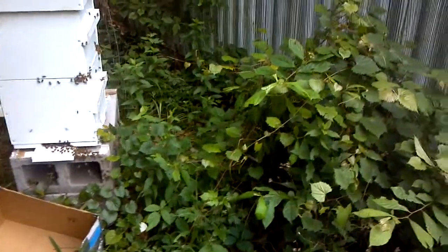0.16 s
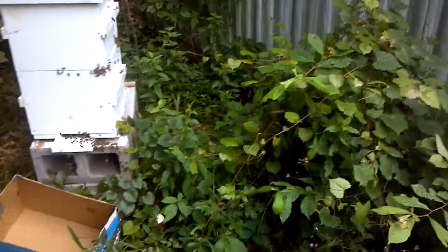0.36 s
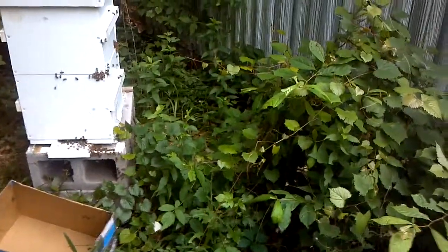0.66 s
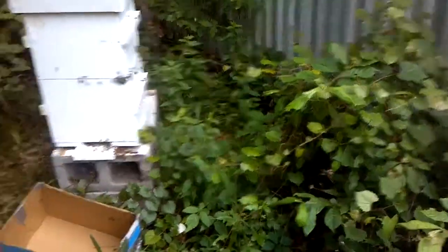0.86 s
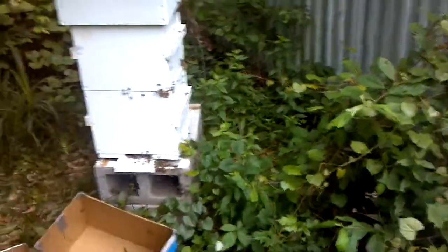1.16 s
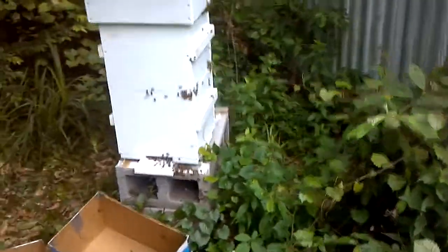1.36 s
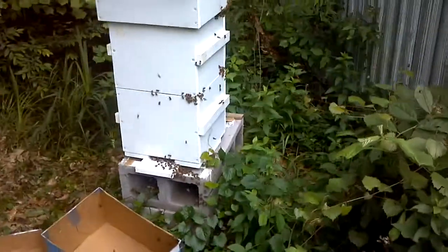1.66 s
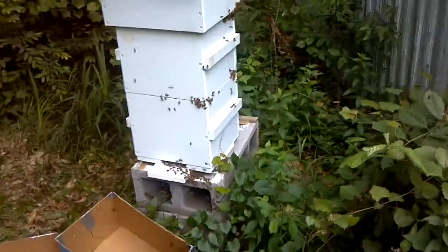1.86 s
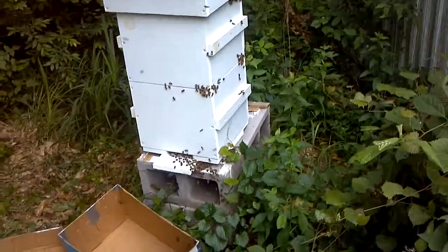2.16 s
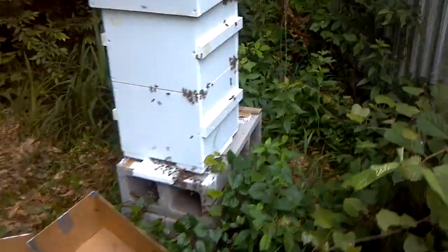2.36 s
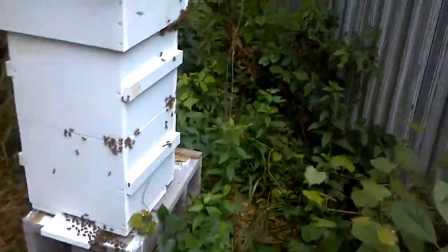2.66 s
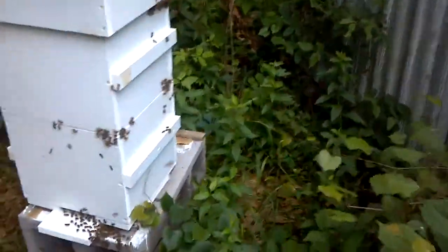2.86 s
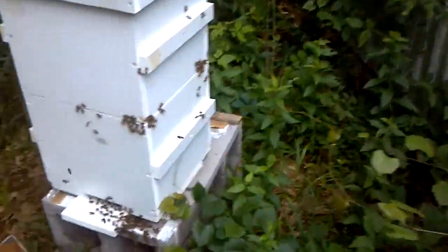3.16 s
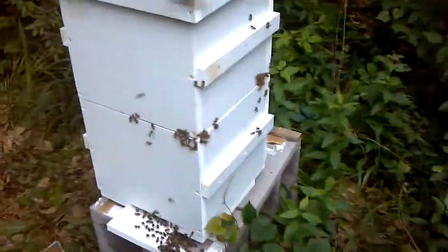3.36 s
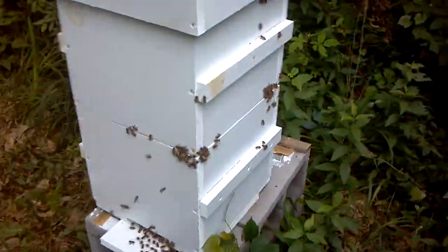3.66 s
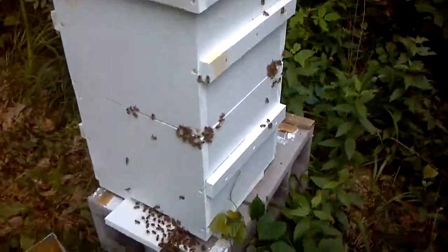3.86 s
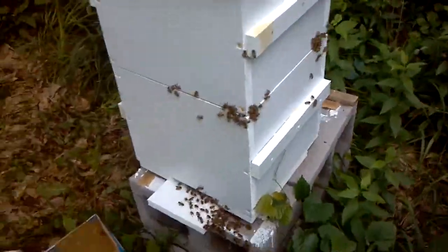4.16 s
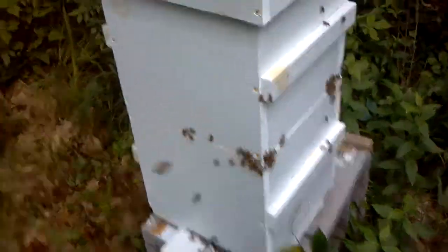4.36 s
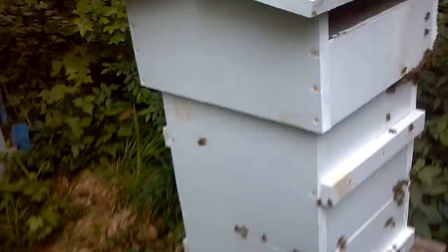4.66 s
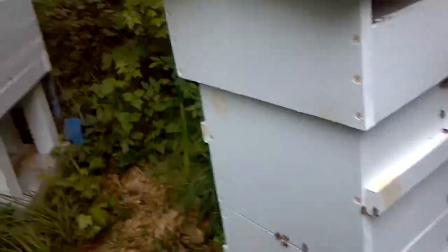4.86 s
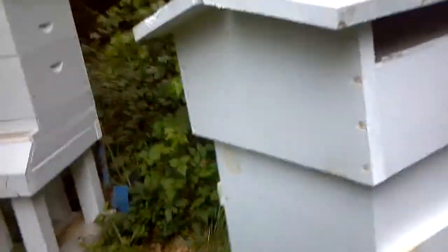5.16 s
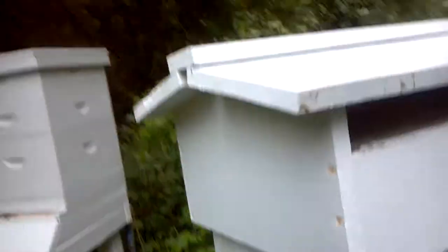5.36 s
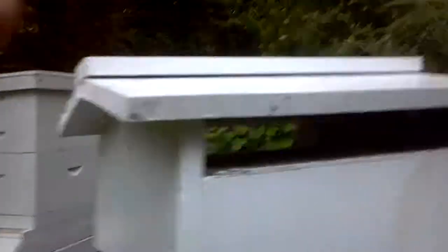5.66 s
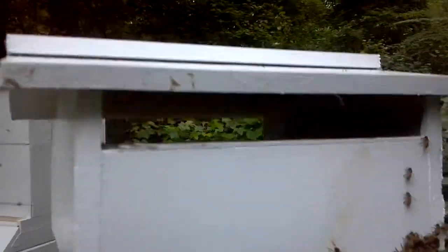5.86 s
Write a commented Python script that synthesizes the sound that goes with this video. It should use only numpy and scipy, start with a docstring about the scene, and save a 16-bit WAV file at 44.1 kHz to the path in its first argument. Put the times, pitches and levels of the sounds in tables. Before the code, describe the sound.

In a still, overgrown yard, a soft unsteady hum of many bees, around 200 to 260 hertz, sits over quiet air, a faint drone and a thin distant insect trill. From 0 to 2 s, branches swish lightly, a stalk snaps at 0.4 s, and small cracks cluster from 1.5 to 1.9 s. At about 2.45 s a board is knocked hard, a tight cluster of woody raps, followed by sharp stem snaps to 2.7 s and a tiny high squeak at 2.8 s. At 3.3 s there is a dull board thud, a footstep and a strong snap. Then leaves rustle more thickly, with gritty scuffs at 3.8, 4.8, 5.1 and 5.4 s, while the hum rises and single bees buzz close at 3.4, 3.65, 4.3, 5.1 and loudest at 5.55 s. At 5.8 s loose wood clatters rapidly and rasps, leaving hum and rustle until 6 s.

```python
"""Honey bees hum around a wooden hive in an overgrown yard: looped wing strokes at unsteady rates; some pass close.
Someone walks up through weeds: filtered noise swishes, rustles and scuffs; stalks snap and squeak, twigs tick.
A board is knocked and loose wood clatters and rubs: decaying modes, contact noise, rasping resonances.
Behind lie still air, a far insect and a faint drone.
The microphone is a close pair of ports, each channel formed as the difference of the two."""
import sys
import numpy as np
from scipy import signal
from scipy.fft import rfft, irfft, next_fast_len
from scipy.io import wavfile

SR = 44100
rng = np.random.default_rng(int(sys.argv[2]) if len(sys.argv) > 2 else 0)


def wrap_up_sound(samples):
    """Save the sound to the file named by the first command line argument, as 16-bit audio."""
    columns = np.atleast_2d(samples).T
    # keep every value between -1 and 1, then stretch to whole-number steps
    tamed = np.clip(columns, -1, 1)
    steps = np.round(tamed * 32767).astype(np.int16)
    wavfile.write(sys.argv[1], SR, steps)


N = 265651
TIME_S = np.arange(N) / SR
PORT_LAG_SAMPLES = 17   # travel from one port to the other


def from_db(db):
    """Decibels to gain."""
    return 10 ** (np.asarray(db) / 20)


def rms_one(x):
    """Scale to an rms of 1."""
    return x / np.sqrt(np.mean(x ** 2) + 1e-20)


def level_curve_db(rows):
    """Level at every sample from (t/s, level/dB) rows."""
    t_s, level_db = np.transpose(rows)
    return np.interp(TIME_S, t_s, level_db)


def at_hz(points, hz):
    """A spectrum read on a log-frequency axis."""
    point_hz, level_db = np.transpose(points)
    return np.interp(np.log(hz + 1e-9), np.log(point_hz), level_db)


def drift(rate_hz):
    """Random curve: straight lines between normal knots, rate_hz knots a second."""
    knots = rng.standard_normal(int(rate_hz * N / SR) + 3)
    return np.interp(TIME_S * rate_hz + rng.random(), np.arange(len(knots)), knots)


def swell(t_s, sigma_s):
    """A bell-shaped rise and fall."""
    return np.exp(-.5 * np.minimum(((TIME_S - t_s) / sigma_s) ** 2, 100))


def resonance(x, hz, width_hz):
    """A two-pole band-pass with gain near 1 on top."""
    r = np.exp(-np.pi * width_hz / SR)
    b = np.array([1, 0, -1]) * (1 - r * r) / 2
    a = [1, -2 * r * np.cos(2 * np.pi * hz / SR), r * r]
    return signal.lfilter(b, a, x + 1e-18)


def resonance_twice(x, hz, width_hz):
    """The same band-pass twice, for steeper skirts."""
    return resonance(resonance(x, hz, width_hz), hz, width_hz)


def butter(x, order, hz, side="low"):
    """Butterworth low-pass or high-pass."""
    return signal.sosfilt(signal.butter(order, hz, side, fs=SR, output="sos"), x)


def decaying(impulses, t60_s):
    """Each impulse starts an exponential decay of 60 dB in t60_s."""
    return signal.lfilter([1], [1, -np.exp(-np.log(1000) / (t60_s * SR))], impulses)


def diffuse(spectrum=None):
    """Noise from all around: the ports agree in the bass and differ in the treble."""
    size = next_fast_len(N)
    hz = np.arange(size // 2 + 1) * SR / size
    alike = np.sinc(2 * hz * PORT_LAG_SAMPLES / SR)
    mid, side = rfft(rng.standard_normal((2, size)))
    ports = np.sqrt(1 + alike) * mid + np.sqrt(1 - alike) * side * [[1], [-1]]
    colour = 1 if spectrum is None else from_db(at_hz(spectrum, hz))
    return rms_one(irfft(ports * colour, size)[:, :N])


def from_bearing(x, bearing):
    """A sound reaches the nearer port first; bearing 1 is left, -1 is right."""
    n, lag = np.arange(N), bearing * PORT_LAG_SAMPLES / 2
    return np.array([np.interp(n + lag, n, x), np.interp(n - lag, n, x)])


# air colour: f/Hz, level/dB
AIR_COLOUR = [(25, -18), (60, -16), (110, 1), (250, 4), (700, 12.5), (1500, -9), (3000, -44), (8000, 7),
              (16000, -6.5)]
INSECT_HZ, INSECT_WIDTH_HZ, INSECT_DB = 5950, 210, -68.5
DRONE_HZ, DRONE_WIDTH_HZ, DRONE_DB = 118.8, 5.7, -77.5


def yard(air_db=-62):
    """Still outdoor air (shaped noise), a far insect's thin trill and a low drone (narrow-band noise)."""
    trill = from_db(INSECT_DB) * rms_one(resonance_twice(diffuse(), INSECT_HZ, INSECT_WIDTH_HZ))
    drone = from_db(DRONE_DB) * rms_one(resonance_twice(diffuse(), DRONE_HZ, DRONE_WIDTH_HZ))
    return from_db(air_db) * diffuse(AIR_COLOUR) + trill + drone


# dull stem colour: f/Hz, level/dB
BRUSH_COLOUR = [(60, -41), (110, -3.5), (300, 8), (700, 3), (1200, 2.5), (1700, 8), (2200, 9), (3200, -36),
                (5000, -41), (15000, -43)]
# leaf colour: f/Hz, level/dB
LEAF_COLOUR = [(500, -22), (2000, -7), (3400, 6.5), (4300, 1), (6000, 3), (9000, 2.5), (12000, 0),
               (15500, -1)]
# depth of the wading, as steady rustle before trim: t/s, level/dB
WADING = [(0, -65.5), (1.9, -60.5), (3.1, -57), (5.2, -56), (6.02, -50.5)]


def twigs(dry_per_s=12, dry_db=-47, dry_t60_s=.004,
          green_per_s=12, green_db=-47, green_t60_s=.007, spread_db=1.5, low_hz=700):
    """Dry twigs tick brightly and green stems dully, at random, louder where the weeds are thick."""
    depth_db = level_curve_db(WADING)
    swing_db = depth_db - depth_db.mean()

    def ticks(colour, per_s, level_db, t60_s):
        """Random breaks, each a short decay of coloured noise."""
        gain = from_db(level_db + swing_db + spread_db * rng.uniform(0.51, 1, N))
        breaks = (rng.random(N) < per_s / SR) * gain
        return diffuse(colour) * decaying(breaks + 1e-18, t60_s)

    dry_ticks = ticks(LEAF_COLOUR, dry_per_s, dry_db, dry_t60_s)
    green_ticks = ticks(BRUSH_COLOUR, green_per_s, green_db, green_t60_s)
    return butter(dry_ticks + green_ticks, 2, low_hz, "high")


# stems drawn over cloth: t/s, sigma/s, f/Hz, glide/(Hz/s), level/dB
SQUEAKS = [(0.46, .035, 12600, -21000, -55), (2.84, .018, 14200, 0, -45), (4.04, .055, 12050, 0, -50)]


def squeaks(roughness_hz=220):
    """Stem over cloth: a thin, rough whistle swells and fades; its pitch holds or glides evenly."""
    whistle, roughness = np.zeros(N), rms_one(drift(roughness_hz))
    for t_s, sigma_s, hz, glide, level_db in SQUEAKS:
        pitch_hz = hz + glide * np.clip(TIME_S - t_s, -3 * sigma_s, 3 * sigma_s)
        tone = np.sin(2 * np.pi * np.cumsum(pitch_hz) / SR)
        whistle += tone * swell(t_s, sigma_s) * from_db(level_db)
    return from_bearing(whistle * roughness, -0.27)


SLIDE_OFF_RATIO = 2.14   # fall time over rise time


def sweep(t_s, rise_s):
    """A branch bends against the body, then slides off more slowly."""
    return np.where(TIME_S < t_s, swell(t_s, rise_s), swell(t_s, rise_s * SLIDE_OFF_RATIO))


def shifting(x, depth_db=1.72, rate_hz=7, count=5):
    """The colour of a rustle keeps changing: each treble band rises and falls by itself."""
    change = 0
    for hz in np.geomspace(3700, 13500, count):
        change = change + resonance(x, hz, 0.85 * hz) * (from_db(depth_db * drift(rate_hz)) - 1)
    return rms_one(x + change)


# branches passing the body, before trim: t/s, rise sigma/s, stem level/dB, leaf level/dB, brightness/dB
SWISHES = [(0.22, 0.098, -54, -57.5, -1.5), (0.91, 0.1, -53.5, -62, 3.5), (1.44, 0.094, -60, -60, 1),
           (2.26, 0.21, -52.5, -58, -6.5), (2.56, 0.047, -51, -50, 3), (2.81, 0.069, -47.5, -54, 1),
           (3.24, 0.067, -47.5, -47, 2), (3.64, 0.13, -52, -50, 1.5), (4.03, 0.078, -53, -52.5, -2.5),
           (4.29, 0.13, -49.5, -50.5, 0), (4.77, 0.095, -50.5, -46.5, 0.5), (5.06, 0.046, -53.5, -46, 1),
           (5.3, 0.14, -49.5, -45.5, -0.5), (5.72, 0.023, -55, -53, -6)]
STEMS_DB, STEMS_FOLLOW = -57, 0.43   # before trim, at the mean rustle; share of the rustle's dB swing


def weeds(stem_trim_db=-0.5, leaf_trim_db=3.0, grain_db=1.5, crisp_hz=5200):
    """Stems brush dully, leaves rustle in fine grains; each branch adds a swish to the steady wading."""
    depth_db = level_curve_db(WADING)
    # powers
    stems = from_db(STEMS_DB + STEMS_FOLLOW * (depth_db - depth_db.mean())) ** 2
    soft = crisp = from_db(depth_db) ** 2
    for t_s, rise_s, stem_db, leaf_db, bright_db in SWISHES:
        contact = sweep(t_s, rise_s)
        stems = stems + (contact * from_db(stem_db)) ** 2
        soft = soft + (contact * from_db(leaf_db - bright_db)) ** 2
        crisp = crisp + (contact * from_db(leaf_db + bright_db)) ** 2
    leaves = shifting(diffuse(LEAF_COLOUR))
    soft_rustle = butter(leaves, 3, crisp_hz) * np.sqrt(soft)
    crisp_rustle = butter(leaves, 3, crisp_hz, "high") * np.sqrt(crisp)
    brushing = diffuse(BRUSH_COLOUR) * np.sqrt(stems) * from_db(stem_trim_db + 1.0 * drift(40))
    leaf_gain = from_db(leaf_trim_db + grain_db * drift(500) + 1.8 * drift(24.955))
    return brushing + (soft_rustle + crisp_rustle) * leaf_gain


# soft earth colour: f/Hz, level/dB
GROUND_COLOUR = [(40, -30), (120, -12), (250, 16), (1500, -2), (8000, 5)]
# gritty scrape colour: f/Hz, level/dB
SCRAPE_COLOUR = [(60, -43), (200, -12), (700, 1.5), (1500, 6), (2600, 5.5), (4500, 1), (6500, 2),
                 (10000, -2.5), (15500, -17)]
# feet on the ground: t/s, sigma/s, thud f/Hz, thud level/dB, scrape level/dB
SCUFFS = [(1.726, 0.03, 800, -74, -53.5), (3.267, 0.041, 500, -57.5, -45), (3.278, 0.0084, 627, -40, -52),
          (3.77, 0.048, 418, -59, -41.5), (3.772, 0.005, 900, -44, -39), (3.79, 0.012, 820, -48, -40),
          (4.827, 0.004, 690, -47, -38.5), (4.85, 0.018, 477, -46, -43.5), (5.091, 0.0017, 634, -38.5, -50),
          (5.103, 0.024, 610, -45, -59), (5.195, 0.018, 590, -45.5, -50), (5.208, 0.0035, 620, -44, -48),
          (5.246, 0.019, 670, -41.5, -49.5), (5.42, 0.004, 760, -39, -36), (5.428, 0.0096, 745, -45, -35),
          (5.448, 0.0065, 636, -37.5, -42)]


def scuffs(thud_width=0.64, grit_db=1.0, catch_db=3.5):
    """Each scuff is a soft thud of the ground under a gritty scrape that catches and slips."""
    ground = diffuse(GROUND_COLOUR)
    grit = diffuse(SCRAPE_COLOUR) * from_db(grit_db * drift(900) + catch_db * drift(150))
    out = np.zeros((2, N))
    for t_s, sigma_s, hz, thud_db, scrape_db in SCUFFS:
        thud = rms_one(resonance_twice(ground, hz, thud_width * hz))
        out += swell(t_s, sigma_s) * (from_db(thud_db) * thud + from_db(scrape_db) * grit)
    return out


# broad resonances of a breaking stalk: f/Hz, width/Hz, gain/dB
STALK_RESONANCES = [(1300, 2190, -15.5), (3670, 3650, -12.5), (6530, 3800, -11.5), (10500, 11000, -9.5)]
# snaps: t/s, level/dB in the four resonances low to high, unused level/dB, splintering re break/dB
SNAPS = [(0.3894, -41, -51, -62, -57, -60, -15), (1.5474, -37.5, -45, -43, -49, -50, -15),
         (1.5883, -40, -52, -63, -63, -61, -15), (1.6586, -37.5, -69, -49.5, -58, -58, -15),
         (1.7135, -48, -57, -46, -47, -49, -15), (1.7204, -54, -47, -61, -54, -52, -15),
         (1.7284, -50, -57, -64, -49, -53, -15), (1.7364, -51, -57, -52, -60, -56, -15),
         (1.8302, -46, -50, -76, -49.5, -54, -15), (1.9131, -38.5, -54, -62, -58, -63, -15),
         (1.9305, -40.5, -49, -57, -58, -62, -15), (2.5356, -28, -40, -62, -50, -50, -15),
         (2.5925, -33, -41, -40, -43, -46, -15), (2.6509, -35.5, -46.5, -60, -56, -52, -15),
         (2.6948, -36.5, -53, -46.5, -56, -57, -15), (2.7087, -47, -42, -50, -54, -55, -15),
         (2.7282, -29.5, -47, -59, -57, -57, -15), (3.0395, -31, -45.5, -54, -57, -60, -15),
         (3.3169, -26.5, -38, -46, -47, -47, -15), (3.5304, -34.5, -33.5, -43, -44, -51, -15),
         (3.5533, -33.5, -66, -44, -48, -50, -15), (4.1639, -33.5, -39, -43, -41, -48, -15),
         (4.4374, -37.5, -43, -45, -53, -52, -15), (4.6344, -39.5, -46, -55, -42, -41, -15),
         (4.8234, -33, -34.5, -41, -41, -42, -15), (5.0325, -36, -39, -46, -43, -43, -15),
         (5.6406, -37.5, -39, -42, -41.5, -46, -15)]


def snaps(break_t60_s=0.0056, splinter_t60_s=0.089, size=4096):
    """A stalk breaks in a sharp click, its fibres splinter briefly; both excite its broad resonances."""
    out, noise, t = np.zeros((2, N)), diffuse(), TIME_S[:size]
    for t_s, *levels_db, splinter_db in SNAPS:
        start = int(t_s * SR)
        span = slice(start, start + size)
        decay = from_db(-60 * t / break_t60_s) + from_db(splinter_db - 60 * t / splinter_t60_s)
        force = noise[:, span] * decay
        # zip stops after the four resonances
        for level_db, (hz, width_hz, gain_db) in zip(levels_db, STALK_RESONANCES):
            out[:, span] += from_db(level_db + gain_db) * rms_one(resonance_twice(force, hz, width_hz))
    return out


# splintery crack colour: f/Hz, level/dB
CRACK_COLOUR = [(100, -23), (400, 3.5), (800, 0.5), (1400, -6), (2200, -1), (3300, -17), (4500, -11),
                (6000, -11.5), (10000, -14.5), (15500, -22)]
CLICK_HZ, CLICK_WIDTH_HZ = 4550, 700   # wood meeting something hard
TICK_T60_S = .011
THUMP_HZ, THUMP_DB = 70, -19   # share of a blow that the ground passes on


def struck_wood(blows, modes, bearing, contact_s, crack_t60_s, tail_db, tail_t60_s, low_hz,
                tick_db, click_db, splinter_db=3, size=6000):
    """Blows ring the modes, high ones more if hard, with click, tick, crack and tail; rest shifts and damps."""
    hz, mode_db, t60_s = np.transpose(modes)[:, :, None]
    octaves = np.clip(np.log2(hz / np.median(hz)), -1, 1)
    ringing, t = np.zeros(N), TIME_S[:size]
    for t_s, ring_db, hardness_db, _, semitones, ring_share in blows:
        start = int(t_s * SR)
        strength = from_db(ring_db + mode_db + hardness_db * octaves)
        decay = from_db(-60 * t / (t60_s * ring_share))
        rings = np.sin(2 * np.pi * hz * 2 ** (semitones / 12) * t) * decay
        ringing[start:start + size] -= (strength * rings).sum(0) * (1 - np.exp(-t / contact_s))
    t_s, _, _, crack_db, _, _ = np.transpose(blows)
    impulses = np.bincount((t_s * SR).astype(int), from_db(crack_db), N) + 1e-18
    crack_envelope = decaying(impulses, crack_t60_s) + from_db(tail_db) * decaying(impulses, tail_t60_s)
    crack = diffuse(CRACK_COLOUR) * crack_envelope * rms_one(from_db(splinter_db * drift(1500)))
    tick = diffuse(SCRAPE_COLOUR) * from_db(tick_db) * decaying(impulses, TICK_T60_S)
    click = from_db(click_db) * resonance(impulses, CLICK_HZ, CLICK_WIDTH_HZ)
    # a small board radiates little bass; a faint thump comes through the ground
    thump = from_db(THUMP_DB) * butter(ringing, 2, THUMP_HZ)
    airborne = from_bearing(ringing + click, bearing) + crack + tick
    return thump + butter(airborne, 4, low_hz, "high")


# board blows: t/s, ring level/dB, hardness/(dB/octave), crack level/dB, shift/semitones, share of t60
BOARD_BLOWS = [(2.4277, -16.5, -1.5, -26.5, 0.2, 0.69), (2.4644, -33, -1, -43, 1, .8),
               (2.4765, -8.5, 3.5, -27, -0.4, 0.55), (2.4814, -12, 4, -24, 0.5, 0.55),
               (2.4898, -32, 4, -34, 2, .8), (2.4964, -22, -2, -36, 0.5, 0.55),
               (2.5059, -35, 6, -49, -5, .7), (2.5215, -40, -4, -58, 1, 0.71),
               (3.2625, -26.5, -4, -52, -2.5, 0.87), (3.2713, -30, 9, -50, -3.5, 1),
               (3.2828, -24, -7, -54, -2, 0.41)]
# board modes: f/Hz, level/dB, t60/s
BOARD_MODES = [(268, -19.5, 0.13), (362, -20, 0.14), (420, -10.5, 0.1), (575, -12, 0.05),
               (840, -12.5, 0.037), (1030, -13.5, 0.039), (1400, -15.5, 0.013), (1690, -32, .035),
               (2280, -25, 0.041)]


def board_knocks():
    """A board knocked and trodden on rings in its modes."""
    return struck_wood(BOARD_BLOWS, BOARD_MODES, bearing=0.16, contact_s=0.000084, crack_t60_s=.016,
                       tail_db=-19.0, tail_t60_s=0.27, low_hz=253, tick_db=1, click_db=23)


# loose wood blows: t/s, ring level/dB, hardness/(dB/octave), crack level/dB, shift/semitones, share of t60
SLAT_BLOWS = [(5.7952, -8.5, 6, -37, -0.48, 0.33), (5.7972, -13, 17, -38, 0.33, 0.68),
              (5.7992, -9, 4, -27.5, 0.55, 0.72), (5.8078, -25, -8, -34, 0.25, 0.78),
              (5.8213, -11.5, 3, -33, 0.14, 0.65), (5.825, -9.5, -1, -30, -0.51, 0.62),
              (5.8292, -14, 2, -27, -0.19, 0.86), (5.8347, -19.5, -7.5, -41, -0.024, 0.96),
              (5.8473, -20, -9.5, -34, 0.15, 0.95), (5.8503, -23, 8, -34, 0.049, 0.88),
              (5.8542, -17.5, -9, -34, -0.097, 0.56), (5.8618, -30, -10, -43, -0.036, 0.6)]
# loose wood modes: f/Hz, level/dB, t60/s
SLAT_MODES = [(570, -21, 0.11), (707, -16, 0.083), (804, -14.5, 0.056), (1037, -13.5, 0.062),
              (1290, -13.5, 0.04), (1363, -9, 0.025), (1430, -15, 0.02), (940, -9.5, 0.026),
              (2080, -18.5, 0.027), (2360, -22, 0.036), (3850, -32, 0.089)]


def slat_clatter():
    """Loose wood clatters: quick blows ring its higher modes."""
    return struck_wood(SLAT_BLOWS, SLAT_MODES, bearing=0.34, contact_s=0.00032, crack_t60_s=.032,
                       tail_db=-17.5, tail_t60_s=0.11, low_hz=404, tick_db=-7, click_db=14)


# loose wood rubbing between blows: t/s, sigma/s, level/dB
RUBS = [(5.8035, 0.005, -35.5), (5.8313, 0.0063, -34), (5.852, 0.0075, -40)]
# rasp resonances: f/Hz, width/Hz
RASP_RESONANCES = [(3190, 280), (3830, 400), (4350, 190)]


def rubs(bearing=0.16):
    """Wood sliding over wood rasps in a few high resonances."""
    friction = rng.standard_normal(N)
    rasp = rms_one(sum(resonance_twice(friction, hz, width_hz) for hz, width_hz in RASP_RESONANCES))
    envelope = sum(swell(t_s, sigma_s) * from_db(level_db) for t_s, sigma_s, level_db in RUBS)
    return from_bearing(rasp * envelope, bearing)


# harmonic strength of a wing stroke: f/Hz, level/dB
WING_SPECTRUM = [(200, -7.5), (260, -0.5), (400, 3), (510, 3), (700, -6), (950, -7.5), (1250, -3.5),
                 (1700, -13.5), (2400, -45), (4000, -32), (7000, -28)]


def bee(wingbeat_hz, bearing, waver=.017, count=28, size=2048):
    """One bee: a wing stroke repeated at a slightly unsteady rate, heard at both ports."""
    hz = wingbeat_hz * (1 + waver * drift(14))
    mean_hz = np.mean(hz)
    harmonic_db = at_hz(WING_SPECTRUM, mean_hz * np.arange(1, count + 1)) + rng.normal(0, 2.4, count)
    phases = np.exp(2j * np.pi * rng.random(count))
    stroke = rms_one(irfft(np.r_[0, from_db(harmonic_db) * phases], size))
    port_cycles = np.array([[1], [-1]]) * bearing * mean_hz * PORT_LAG_SAMPLES / SR / 2
    cycles = np.cumsum(hz) / SR + port_cycles
    return stroke[(cycles * size).astype(int) % size]


# single bees passing close: t/s, wingbeat f/Hz, glide/(Hz/s), level/dB
NEAR_BEES = [(0.923, 248.6, -34, -64), (2.872, 245, -25, -75), (3.382, 220.1, 18, -54.5),
             (3.651, 257, -70, -53.5), (4.322, 235.2, 30.5, -54.5), (5.12, 217.3, -1.5, -53.5),
             (5.557, 251, -14.5, -48), (5.903, 237, 0.5, -64)]
PASS_SIGMA_S = .12


def near_bees():
    """A close bee swells out of the hum and fades, its pitch sliding as it turns."""
    out = np.zeros((2, N))
    for t_s, hz, glide, level_db in NEAR_BEES:
        pitch_hz = hz + glide * np.clip(TIME_S - t_s, -2 * PASS_SIGMA_S, 2 * PASS_SIGMA_S)
        out += bee(pitch_hz, rng.uniform(-0.25, 1.0)) * swell(t_s, PASS_SIGMA_S) * from_db(level_db)
    return out


# hum before trim, louder as the hive comes nearer: t/s, level/dB
HUM = [(0.0, -56), (0.45, -57.5), (2.18, -58), (3.17, -52.5), (5.16, -49.5), (5.31, -46.5), (6.02, -48.5)]
WEAVE_DB = 2.3   # limit of a bee's level swing, each way


def swarm(wingbeat_hz=246, spread_hz=10, slow_hz=207, slow_spread_hz=15, wander=.035, trim_db=1.0, count=27):
    """Many bees, each weaving nearer and farther; every third beats its wings more slowly."""
    out = np.zeros((2, N))
    offsets, bearings = np.linspace(-1.5, 1.5, count), rng.uniform(-0.52, 1.0, count)
    for k, (offset, bearing) in enumerate(zip(offsets, bearings)):
        hz = slow_hz + slow_spread_hz * offset if k % 3 == 0 else wingbeat_hz + spread_hz * offset
        weave = from_db(WEAVE_DB * np.tanh(drift(7)))
        out += bee(hz * (1 + wander * drift(4)), bearing) * weave
    return rms_one(out) * from_db(level_curve_db(HUM) + trim_db)


def scene():
    """Sound pressure at the two ports."""
    walker = twigs() + squeaks() + weeds() + scuffs() + snaps()
    wood = board_knocks() + slat_clatter() + rubs()
    return yard() + walker + wood + near_bees() + swarm()


def record(dry, shelf_hz=600, leak_hz=90, gain_db=-4.0, cutoff_hz=15500):
    """Each channel is its port minus the delayed other port; a shelf restores the bass; the top is cut."""
    delayed_other = np.pad(dry[::-1], ((0, 0), (PORT_LAG_SAMPLES, 0)))[:, :N]
    aimed = dry - delayed_other
    zero, pole = np.exp(-2 * np.pi * np.array([shelf_hz, leak_hz]) / SR)
    shelved = from_db(gain_db) * signal.lfilter([1, -zero], [1, -pole], aimed)
    return signal.sosfilt(signal.ellip(12, .1, 80, cutoff_hz, fs=SR, output="sos"), shelved)


dry = scene()
out = record(dry)
wrap_up_sound(out)
```